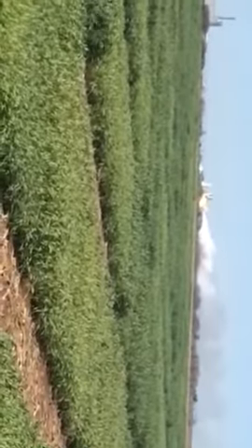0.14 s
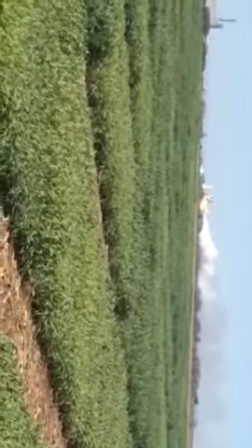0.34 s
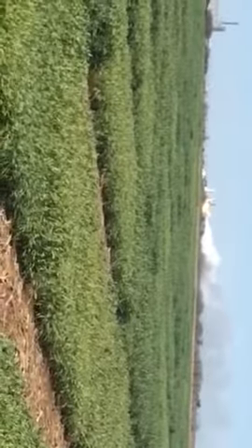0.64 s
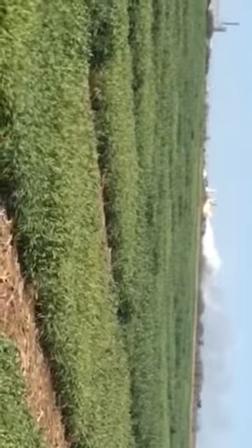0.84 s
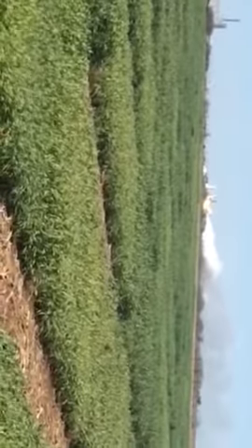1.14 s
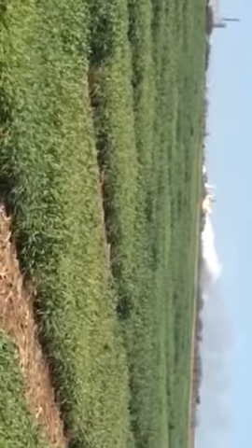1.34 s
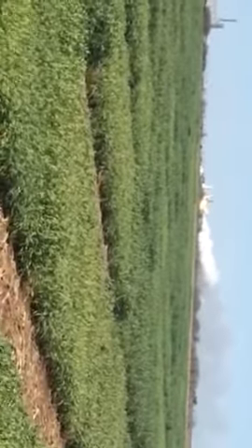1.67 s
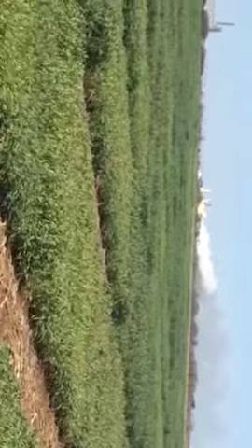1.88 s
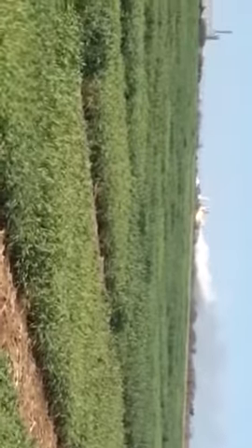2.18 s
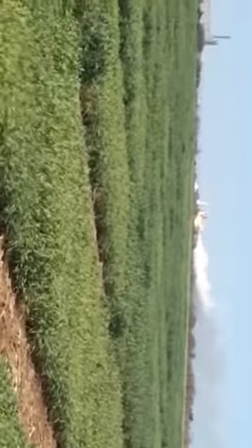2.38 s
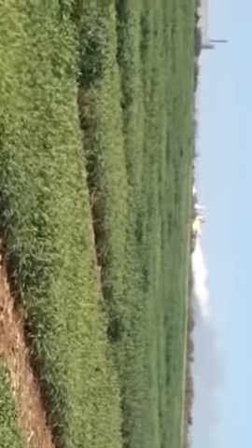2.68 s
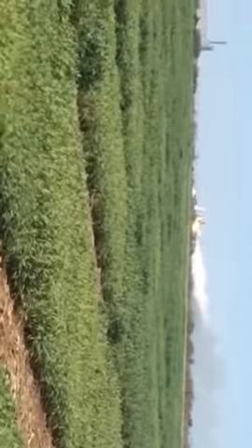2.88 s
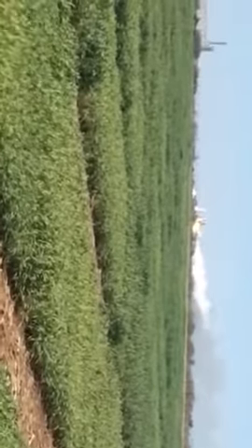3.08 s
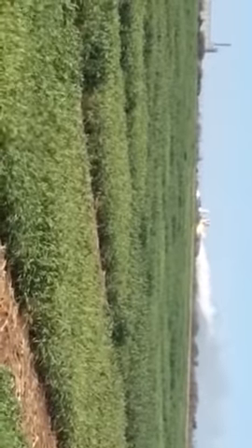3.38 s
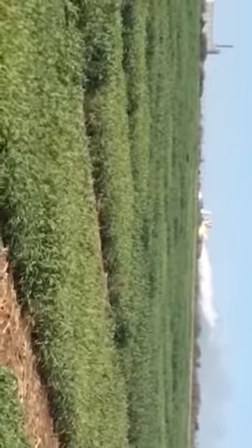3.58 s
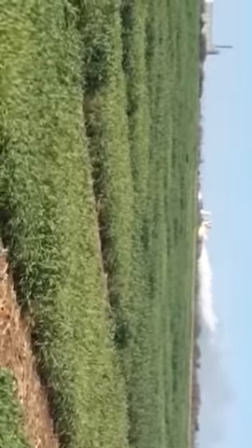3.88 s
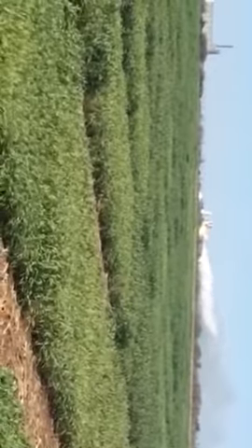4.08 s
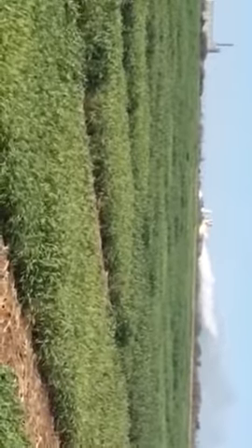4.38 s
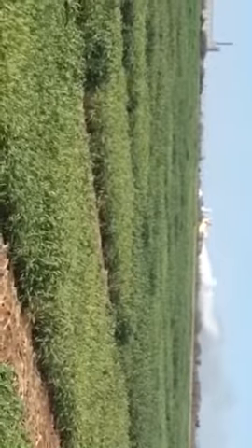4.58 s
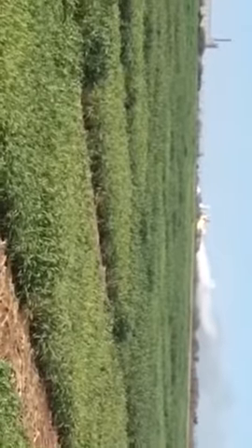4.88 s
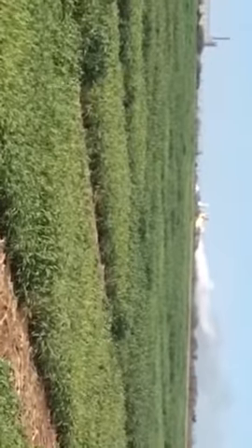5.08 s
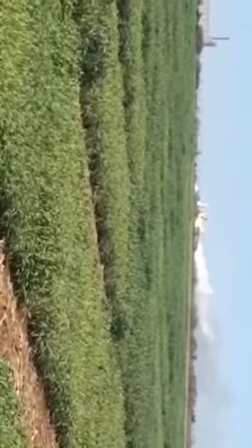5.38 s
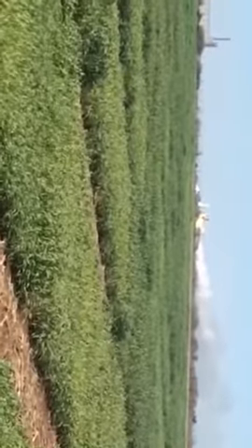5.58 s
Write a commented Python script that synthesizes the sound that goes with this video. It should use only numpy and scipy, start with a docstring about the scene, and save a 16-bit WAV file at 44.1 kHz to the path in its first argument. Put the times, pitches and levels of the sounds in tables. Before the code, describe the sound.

Outdoors on flat green farmland, a rocket engine fires on a test stand near the horizon, already burning at the start and still burning at 5.7 seconds. Distance has removed the treble: the roar is broad, dull noise, strongest in the low mids and nearly gone above about 2 kHz. It wavers gently, swelling within the first half second, fullest near 3.5 seconds, duller after about 5.1, with a slow swirling, comb-like change of colour. Under it an uneven bass rumble surges and ebbs continuously. Wind on the close microphone adds brief low thumps and flutters, softer and longer in the first second, then sharper, with strong knocks around 1.0, 1.25, 1.4, 3.13 and 5.0 seconds, and smaller ones between. The fast, hard 1.4-second hit has a slight burbling rasp. A very faint, even breeze and microphone hiss stays behind everything. The sound is mono, dry and open.

```python
"""Across flat fields, far off, a rocket engine burns steadily on a test stand.
Its roar is noise with the treble worn away by the air; it swells, fades and shifts colour along the windy path.
Under it rolls an uneven rumble, built from many pressure waves that arrive at random moments.
Close by, wind buffets the microphone in runs of pressure swings, over a faint hiss of filtered noise."""
import sys
import numpy as np
from scipy import signal
from scipy.fft import rfft, irfft
from scipy.io import wavfile
from scipy.ndimage import uniform_filter1d

SR = 44100
rng = np.random.default_rng(int(sys.argv[2]) if len(sys.argv) > 2 else 0)


def output_pcm(signal):
    """Save a mono or channel-first signal as 16-bit PCM at the path in sys.argv[1].

    Samples are clipped to [-1, 1] before scaling.
    """
    pcm = np.clip(np.atleast_2d(signal).T, -1, 1) * 32767
    wavfile.write(sys.argv[1], SR, np.round(pcm).astype(np.int16))


N = 252693
T = np.arange(N) / SR  # time of each sample, in seconds


def undb(db):
    """Turn decibels into a gain."""
    return 10 ** (np.asarray(db) / 20)


def unit(x):
    """Scale a sound to an average strength (rms) of 1."""
    return x / np.sqrt(np.mean(x ** 2))


def noise():
    """Plain white noise: every pitch equally strong."""
    return rng.standard_normal(N)


def curves(table):
    """Turn each column after start_s into a curve over time, joined by straight lines."""
    start_s, *columns = np.transpose(table)
    return [np.interp(T, start_s, column) for column in columns]


def colour(x, points):
    """Filter a sound by a spectrum of (pitch_hz, level_db) points."""
    pitch_hz, level_db = np.transpose(points)
    bins_hz = np.maximum(np.arange(N // 2 + 1) * SR / N, 1)
    gain_db = np.interp(np.log(bins_hz), np.log(pitch_hz), level_db)
    return irfft(rfft(x) * undb(gain_db), N)


def bands(x, centres_hz):
    """Split a sound into overlapping pitch bands that add back up to it."""
    spectrum = rfft(x)
    bins_hz = np.arange(len(spectrum)) * SR / N
    shares = np.eye(len(centres_hz))
    return [irfft(spectrum * np.interp(bins_hz, centres_hz, share), N) for share in shares]


def walk(rate):
    """Wander smoothly at random, rms 1, with about `rate` new values a second."""
    size = int(SR / rate)
    steps = np.repeat(rng.standard_normal(N // size + 2), size)
    return unit(uniform_filter1d(steps, size)[:N])


def bent_paths(x, count=5, late_ms=8, wander_ms=.8, share=0.12):
    """Wind bends sound along slightly longer paths; their wandering delays comb it and make it swirl."""
    sample = np.arange(N)
    out = x
    for delay_ms in late_ms * rng.uniform(.5, 1.5, count):
        lag = (delay_ms + wander_ms * walk(rate=3)) * SR / 1000
        late = np.interp(sample - lag, sample, x, period=N)
        out = out + share * walk(rate=2.974) * late
    return out


# How well the wind carries the roar: start_s [s], swell_db [dB], extra upper_edge_db [dB]
PATH_SWELL = [(0, -4, 4), (.17, -1.1, -2.5), (.45, 0.5, 0), (.6, -0.5, 3), (.9, -0.65, 1.5),
              (1.15, 0.6, -1), (1.8, 0.5, -1), (2.25, -1, 3), (2.7, 0.9, 1.8), (3.15, 0.1, 1.5),
              (3.55, 2, 0.5), (4.0, 0.25, 1.5), (4.13, 0.1, 1.5), (4.35, -1, 0), (4.6, 0, -1.5),
              (4.85, -1.6, 2), (5.15, -1, -9), (5.35, -2, -2), (5.55, 0.8, -4), (5.7, -0.5, -5.5)]
# Basic colour of the distant roar: pitch_hz [Hz], relative level_db [dB per Hz]
ROAR_COLOUR = [(120, -14.5), (220, -8.5), (280, -8), (370, -1.27), (540, 0.57), (690, -4), (800, -3.5),
               (930, -4), (1100, -9.5), (1350, -12), (1650, -20), (1950, -27.2), (2400, -44.5), (3200, -79)]
# Band where the ground reflection adds to or cancels the direct sound:
# start_s [s], centre pitch_hz [Hz], lift_db [dB]
GROUND_REFLECTION = [(0, 368, 1), (.5, 390, -3), (.8, 415, 3), (1.25, 350, 4.5), (1.5, 470, 5.5),
                     (1.9, 530, 3), (2.4, 590, 2.5), (2.6, 465, -2), (2.75, 317, 4.5), (2.95, 346, 2.5),
                     (3.2, 412, 5.5), (3.6, 353, 6), (3.9, 320, 3.5), (4.15, 350, -3), (4.5, 435, -3.5),
                     (4.65, 420, 0), (4.82, 460, 4), (4.98, 402, -1.5), (5.35, 348, -3), (5.6, 550, 1.5),
                     (5.7, 570, 1.5)]
# Lift of the middle of the roar: start_s [s], level_db [dB]
MIDDLE_LIFT = [(0, -1), (.42, 1), (.95, 0.4), (1.5, -1.9), (2.0, 1.4), (2.5, 1.3), (2.95, -0.4), (3.5, 0.5),
               (3.75, -0.5), (4.05, -0.5), (4.35, 1), (4.55, 2), (4.8, 1), (5.7, -1.5)]
# Lift of the topmost rim of the roar, which flares and drops: start_s [s], level_db [dB]
RIM_LIFT = [(0, 0), (.6, -0.5), (.87, 4), (1.12, -1.3), (1.72, 0.5), (1.92, -3.5), (2.08, 0), (2.3, -2),
            (2.85, -4), (3.1, 0), (3.2, 2), (3.3, -6), (3.55, 1.5), (3.72, -1), (3.8, 4), (3.85, -1.5),
            (4.03, -3.5), (4.09, -3), (4.135, 5.5), (4.19, -1), (4.38, -2), (4.47, 0), (4.56, -.5),
            (4.64, 2.5), (4.75, -3), (5.15, 4), (5.7, 3)]
ROAR_DB = -29.5  # before the band levels move


def roar(ground_octaves=0.27, middle_hz=850, middle_octaves=0.62, edge_hz=1400, edge_db=-1,
         rim_hz=1850, flutter_db=0.59, patchy_db=1.0):
    """Jet mixing noise; the ground reflection and turbulent air make its bands come and go."""
    path_db, upper_db = curves(PATH_SWELL)
    swell_db = path_db - path_db.mean()
    ground_hz, ground_db = curves(GROUND_REFLECTION)
    middle_db, = curves(MIDDLE_LIFT)
    rim_db, = curves(RIM_LIFT)
    jet = unit(colour(bent_paths(noise()), ROAR_COLOUR))
    centres_hz = 200 * 2 ** (np.arange(19) / 5)  # five bands an octave
    flutter = flutter_db * np.tanh(walk(rate=30))  # shared by all bands
    out = 0
    for hz, band in zip(centres_hz, bands(jet, centres_hz)):
        # the band where direct and reflected sound agree slides as the wind bends them
        ground = ground_db * np.exp(-(np.log2(hz / ground_hz) / ground_octaves) ** 2)
        middle = middle_db * np.exp(-(np.log2(hz / middle_hz) / middle_octaves) ** 2)
        # the upper edge and the rim above it have swells and fades of their own
        edge = (edge_db + upper_db) / (1 + (edge_hz / hz) ** 8)
        rim = rim_db / (1 + (rim_hz / hz) ** 12)
        # turbulent air shakes short waves more than long ones
        shimmer = (flutter + patchy_db * walk(rate=12)) * (hz / middle_hz) ** .25
        out = out + band * undb(swell_db + ground + middle + edge + rim + shimmer)
    return out * undb(ROAR_DB)


# Strength of the rumble before trim and surges: start_s [s], level_db [dB]
RUMBLE_STRENGTH = [(0, -29), (.35, -34), (.7, -32.5), (1.1, -31), (1.8, -31), (2.25, -33), (2.5, -30.5),
                   (2.65, -35), (3.05, -30.5), (3.45, -37.5), (3.85, -32), (4.05, -35), (4.2, -32.5),
                   (4.4, -33.5), (4.8, -31), (5.7, -32.5)]
# Colour of the rumble: pitch_hz [Hz], relative level_db [dB per Hz]
RUMBLE_COLOUR = [(12, -24.5), (25, -16), (40, -2), (53, 3.5), (70, 4), (95, 4.5), (130, 1.5), (180, -1),
                 (240, -12), (330, -28.5), (700, -78)]


def rumble(per_second=350, scatter_db=1.4, smooth_share=0.79, surge_db=1.86, trim_db=2.95):
    """Large eddies of uneven size each send a low pressure wave at a random moment; they come in surges."""
    level_db, = curves(RUMBLE_STRENGTH)
    arrivals = rng.random(N) < per_second / SR
    push_or_pull = rng.choice([-1, 1], N)
    eddies = arrivals * push_or_pull * undb(scatter_db * noise())
    pressure = unit(eddies) + smooth_share * noise()
    surges_db = surge_db * walk(rate=9)
    return unit(colour(pressure, RUMBLE_COLOUR)) * undb(level_db + trim_db + surges_db)


# Wind buffets on the microphone, strong and weak, before trim:
# middle of the buffet [s], peak level_db [dB], swing pitch_hz [Hz], half_length_s [s]
WIND_BUFFETS = [(.010, -18.5, 92, 0.021), (.044, -20, 70, 0.0099), (.125, -19, 100, 0.016),
                (.171, -17.5, 62, 0.018), (.281, -19.5, 99, 0.011), (.428, -19, 65, 0.014),
                (.472, -15, 65, 0.02), (.490, -18, 114, 0.014), (.550, -23, 89, 0.013),
                (.586, -14.5, 140, 0.0061), (.651, -21, 104, 0.018), (.775, -22.5, 87, 0.031),
                (.87, -17.5, 110, .015), (.921, -19.5, 83, .008), (1.022, -11, 130, .008),
                (1.054, -17, 104, .007), (1.135, -13.5, 100, .0075), (1.180, -21, 88, 0.011),
                (1.252, -12, 131, 0.0032), (1.309, -27, 115, 0.009), (1.365, -15.5, 131, 0.012),
                (1.424, -8, 147, 0.0079), (1.468, -22, 136, 0.012), (1.595, -12, 92, 0.0055),
                (1.676, -12.5, 84, 0.0083), (1.727, -20, 123, 0.0075), (1.807, -18.5, 141, 0.015),
                (1.959, -18.5, 77, 0.011), (2.041, -13, 154, 0.0049), (2.075, -23, 200, 0.017),
                (2.101, -13.5, 80, 0.0073), (2.134, -20, 80, 0.0056), (2.374, -21, 145, .018),
                (2.452, -18.5, 86, .01), (2.501, -15, 119, 0.0042), (2.695, -19.5, 95, 0.0074),
                (2.731, -14.5, 100, .0075), (2.806, -16, 205, 0.0093), (2.880, -24, 156, 0.023),
                (2.944, -19.5, 106, 0.013), (3.020, -19.5, 149, .009), (3.060, -21, 101, 0.0053),
                (3.134, -8, 84, .0075), (3.164, -20, 120, 0.014), (3.339, -14, 84, 0.009),
                (3.596, -23, 102, 0.022), (3.662, -18, 92, .014), (3.769, -16, 100, 0.0087),
                (3.824, -15, 77, 0.015), (3.914, -18, 190, 0.02), (3.955, -24, 185, 0.012),
                (3.991, -18, 87, 0.0077), (4.118, -19.5, 105, 0.0059), (4.175, -17.5, 81, 0.0062),
                (4.213, -16.5, 100, 0.015), (4.278, -13, 101, 0.0074), (4.555, -18.5, 77, 0.016),
                (4.779, -22.5, 143, 0.013), (4.956, -20.5, 86, 0.0058), (5.001, -9, 84, 0.006),
                (5.068, -22.5, 99, 0.012), (5.163, -12, 83, 0.008), (5.215, -18, 100, 0.013),
                (5.336, -17.5, 103, 0.0074), (5.510, -22.5, 115, 0.019), (5.607, -19, 105, .01),
                (5.631, -11.5, 130, 0.0038)]
# Smaller eddies tumbling inside a buffet: pitch_hz [Hz], relative level_db [dB per Hz]
BURBLE_COLOUR = [(90, -9), (170, 0), (240, -1), (330, -7.5), (600, -28), (1500, -70), (4000, -120)]
# Fine turbulence inside a fast buffet: pitch_hz [Hz], relative level_db [dB per Hz]
RASP_COLOUR = [(100, -6), (250, 0), (400, -3), (600, -10), (1500, -29), (2200, -35.5), (3100, -38),
               (3500, -45), (4000, -64), (6000, -95)]
BURBLE_DB, RASP_DB = -24.5, -23  # before each buffet's own strength
FAST_HZ = 138  # swing pitch that counts as fast


def buffets(trim_db=-1.25, steepness=0.18, hard_db=-8.0):
    """Eddies cross the microphone port, each a run of one to several swings; fast ones burble, hard ones rasp."""
    swings, burble, rasp = np.zeros((3, N))
    stagger = .3 * walk(rate=140)
    phases = rng.uniform(0, 2 * np.pi, len(WIND_BUFFETS))
    for (middle_s, db, hz, half_s), phase in zip(WIND_BUFFETS, phases):
        near = np.abs(T - middle_s) < .08
        age = T[near] - middle_s
        swell = np.exp(-(age / half_s) ** 2)
        # the more swings an eddy makes, the more unevenly they follow each other
        turn = 2 * np.pi * hz * age + phase + hz * half_s * stagger[near]
        # fast swings steepen at their height, which gives the thump its punch
        punch = steepness * hz / FAST_HZ * swell ** 2 * np.sin(2 * turn)
        swings[near] += undb(db + trim_db) * (swell * np.cos(turn) + punch)
        # loud, fast swings bring small eddies
        speed = undb(db - hard_db) * hz / FAST_HZ
        burble[near] += speed * hz / FAST_HZ * swell
        # fine turbulence grows steeply with speed and is strongest at the height of each swing
        rasp[near] += min(speed, 1) ** 8 * swell * np.cos(turn) ** 2
    rasp = undb(RASP_DB) * rasp * unit(colour(noise(), RASP_COLOUR))
    burble = undb(BURBLE_DB) * burble * unit(colour(noise(), BURBLE_COLOUR))
    return swings + burble + rasp


# Colour of breeze and microphone hiss: pitch_hz [Hz], relative level_db [dB per Hz]
HISS_COLOUR = [(500, 0), (2400, -1), (2950, .3), (3600, -5.9), (4450, -5), (5000, -9.5), (5500, -12),
               (6500, -13.5), (7000, -15.5), (7400, -13), (7800, -17), (10000, -21.7), (15000, -23.8)]
HISS_DB = -66.2


def hiss():
    """Faint, steady breeze in the crop and the microphone's own noise, as one filtered noise."""
    return unit(colour(noise(), HISS_COLOUR)) * undb(HISS_DB)


def scene():
    """Add roar and rumble from afar to buffets and hiss from close by."""
    return (roar() + rumble() + buffets() + hiss())[None]


def record(dry, fade_s=.004, top_hz=15250):
    """The recorder fades in over a few milliseconds and cuts everything above its top pitch."""
    fade = np.minimum(T / fade_s, 1)
    # steep low-pass: 0.2 dB ripple below the top, 70 dB down above it
    top_cut = signal.ellip(8, .2, 70, top_hz, fs=SR, output="sos")
    return signal.sosfilt(top_cut, dry * fade)


dry = scene()
out = record(dry)
output_pcm(out)
```